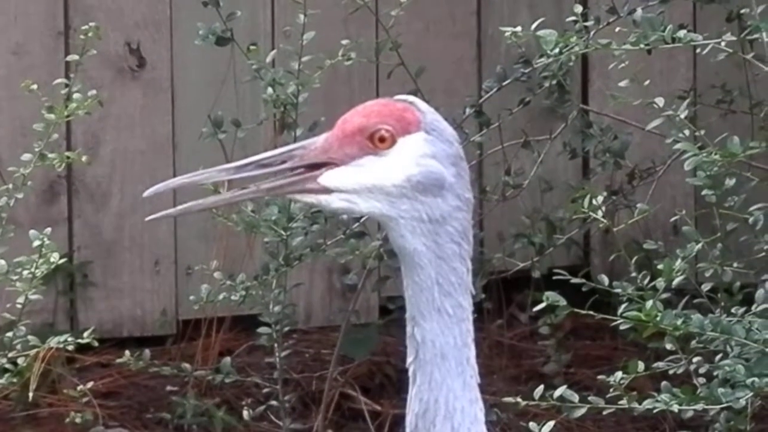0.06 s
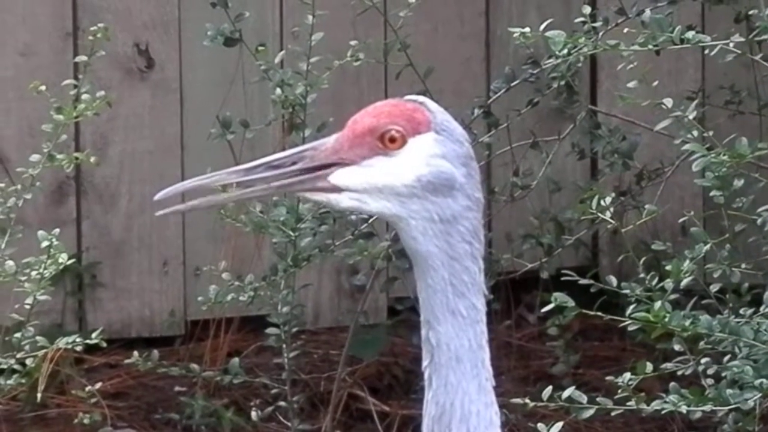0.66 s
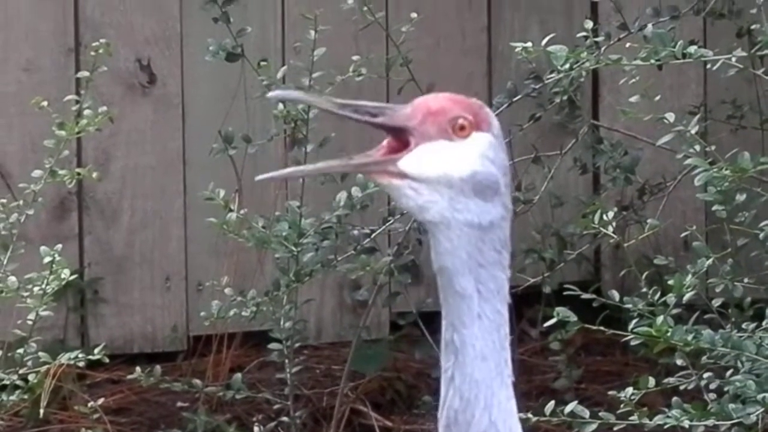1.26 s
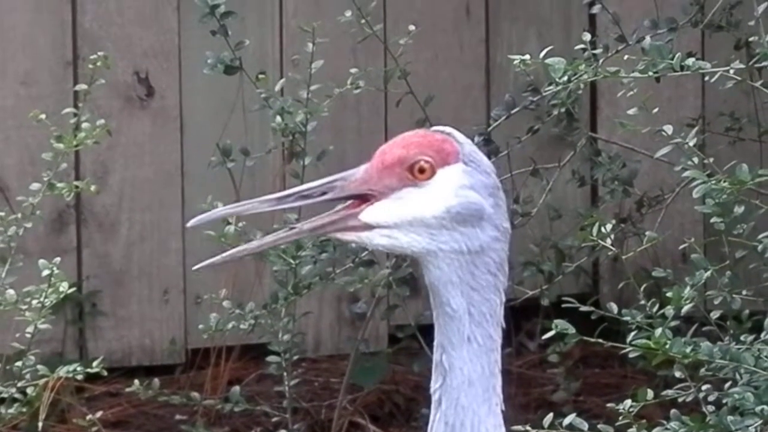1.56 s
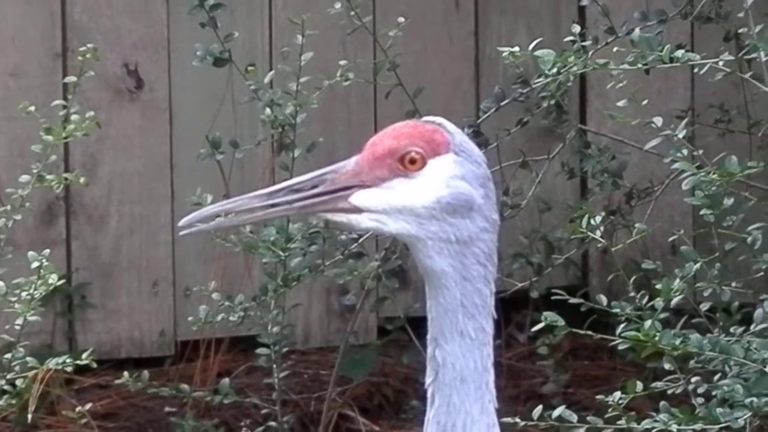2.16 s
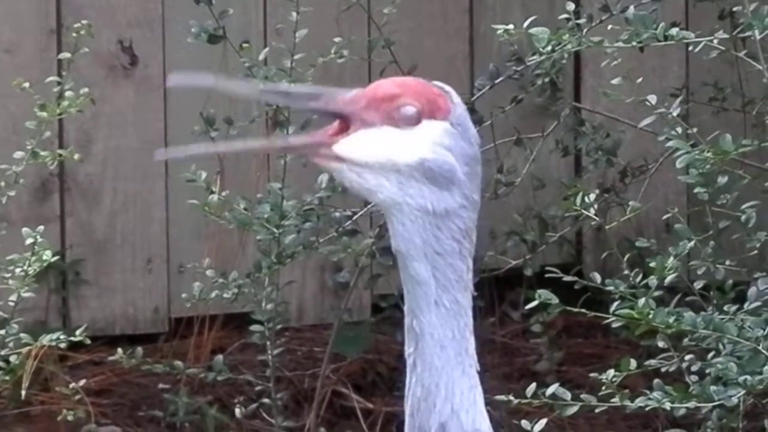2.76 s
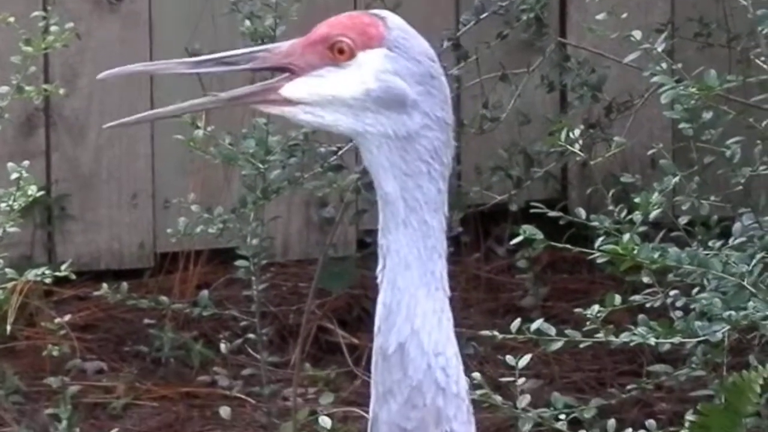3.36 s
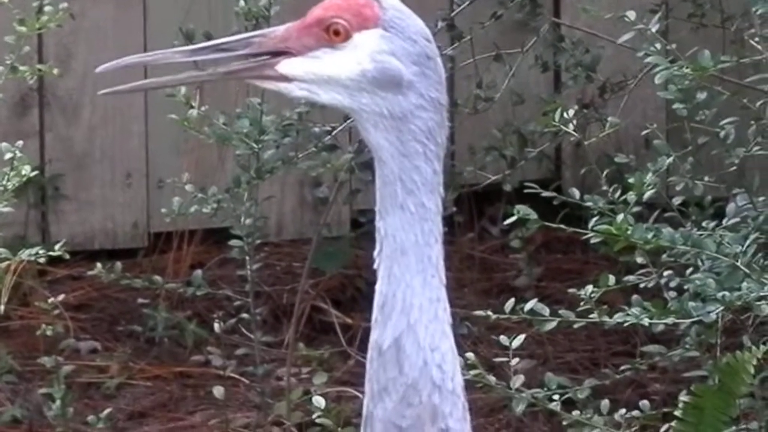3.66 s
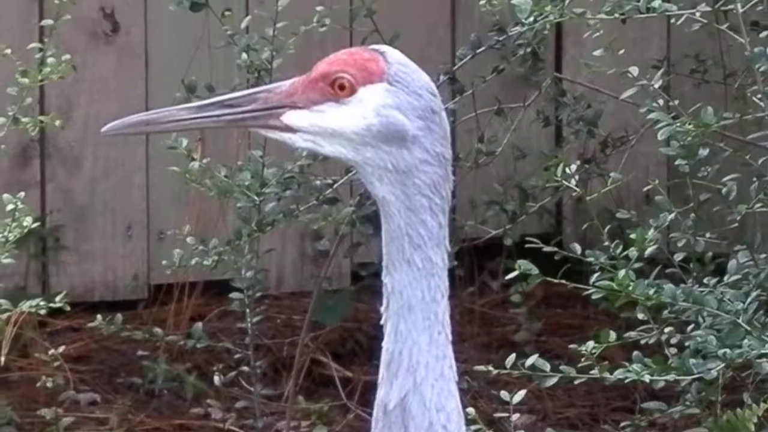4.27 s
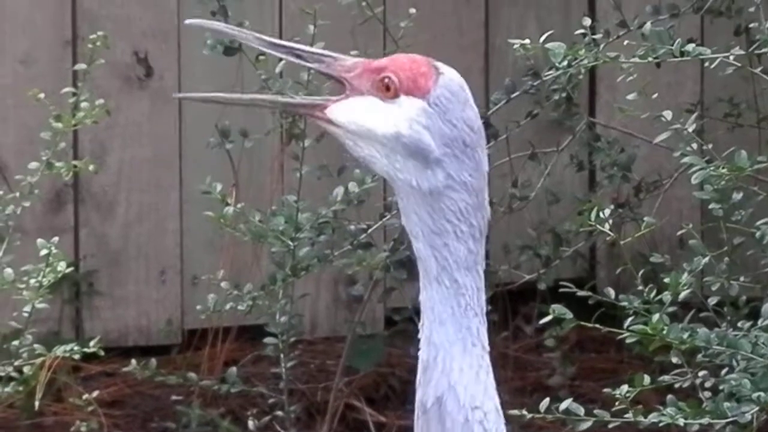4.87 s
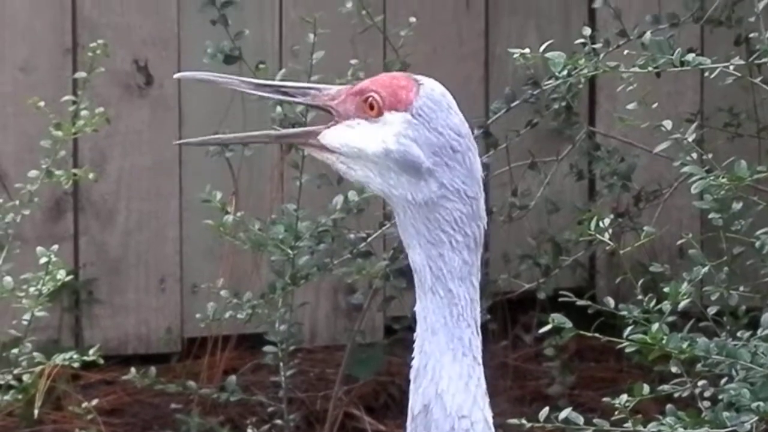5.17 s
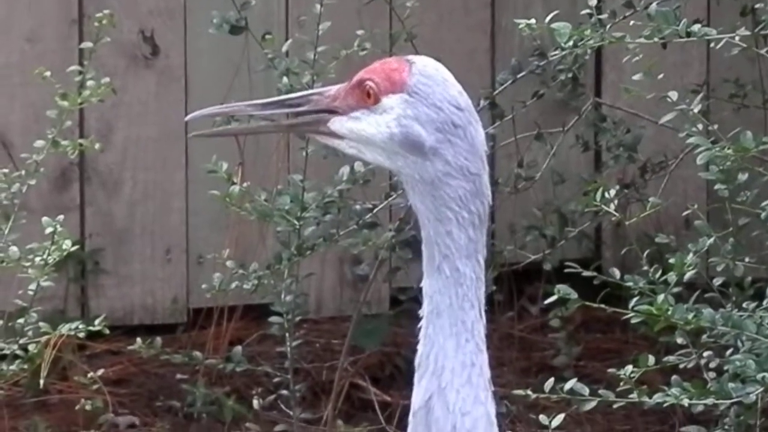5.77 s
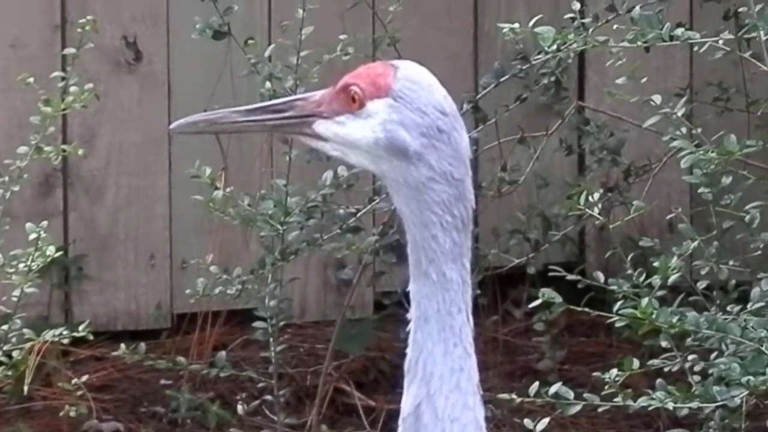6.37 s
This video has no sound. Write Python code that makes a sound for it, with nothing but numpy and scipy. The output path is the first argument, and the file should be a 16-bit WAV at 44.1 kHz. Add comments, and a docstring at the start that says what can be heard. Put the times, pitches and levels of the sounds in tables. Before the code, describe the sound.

Two cranes call close by in a fenced yard, over the low roar of distant traffic and a faint machine hum. At about 0.8 seconds a short, hoarse rising note cracks higher and breaks into a loud roll of quick falling pulses, lasting until 1.4 seconds. Similar rattles, mixed with brief squawks, come from 2.6 to 3.2 and from 4.5 to 5.2 seconds. The two voices interleave, one lower and harsher, the other higher and mellower, with a short echo. Soft, brief coos fall near 0.5, 2.1, 3.5 and 4.1 seconds. A small bird whistles faintly far off around 2.2, 4.3 and 5.8 seconds, and shrubs give light dry ticks, clearest near 1.8 and 3.9 seconds. The background drops at every call and slowly swells back. At about 6.3 seconds one more loud opening note sounds at the end.

```python
"""Two sandhill cranes give rattling calls nearby in a fenced yard, with squawks and soft coos.
Membranes in the syrinx are the source, the long windpipe is the filter: a rising note flips to a higher
register, then breaks into a roll of short falling pulses, reflected by ground, fence and wall.
Behind them a small bird whistles far off, shrubs tick, traffic roars and a machine hums.
Automatic gain control ducks the background at every call and lets it swell back."""
import sys
import numpy as np
from scipy import signal
from scipy.fft import rfft, irfft, next_fast_len
from scipy.io import wavfile
from scipy.ndimage import uniform_filter1d, map_coordinates

SR = 44100
rng = np.random.default_rng(int(sys.argv[2]) if len(sys.argv) > 2 else 0)


def wav_out(sig):
    """Save sig, one row per channel (or a flat mono array), as 16-bit PCM at SR to the path in sys.argv[1]."""
    wavfile.write(sys.argv[1], SR, np.round(np.clip(np.atleast_2d(sig).T, -1, 1) * 32767).astype(np.int16))


N = 282681
TOP_HZ = 16000


def amp(db):
    """Amplitude ratio of a level in decibels."""
    return 10 ** (np.asarray(db) / 20)


def unit(x):
    """Normalisation to rms 1."""
    return x / np.sqrt(np.mean(x ** 2) + 1e-20)


def along(points, hz):
    """Interpolation of (f/Hz, value) points on a logarithmic frequency axis."""
    f, v = np.transpose(points)
    return np.interp(np.log(hz + 1), np.log(f), v)


def clock(length):
    """Sample times over a length in seconds."""
    return np.arange(int(length * SR)) / SR


def wobble(rate, size):
    """Smooth random modulation: a spline with rate knots a second."""
    knots = rng.standard_normal(int(size * rate / SR) + 4)
    return map_coordinates(knots, [np.arange(size) * rate / SR])


def filtered(x, response):
    """Zero-phase filtering: the spectrum times a response of frequency."""
    size = next_fast_len(len(x) + 8192)
    return irfft(rfft(x, size) * response(np.fft.rfftfreq(size, 1 / SR)), size)[:len(x)]


def gate(t, length, rise, fall):
    """Envelope with raised-cosine attack and release."""
    return np.sin(np.pi / 2 * np.clip(t / rise, 0, 1) * np.clip((length - t) / fall, 0, 1)) ** 2


def add(track, start, sound):
    """Superposition of a sound on the track, from start in seconds."""
    part = track[round(start * SR):][:len(sound)]
    part += sound[:len(part)]


# spectrum of distant traffic: f/Hz, relative level/dB
TRAFFIC_SPECTRUM = [(25, -13.5), (42, -13.5), (80, -1.5), (115, -1.5), (160, -2), (250, -1.5), (384, -3.5),
                    (520, -8.5), (800, -9), (950, -15.5), (2700, -27.5), (3300, -36.5), (5000, -38),
                    (7000, -47), (9300, -46), (11500, -58), (16000, -58)]

def traffic(level_db=-18.5, patchy_db=1.5):
    """Broadband noise, strongest in the bass, modulated in patches of time and frequency."""
    spectra = signal.stft(rng.standard_normal(N), nperseg=1024)[2]
    patches = uniform_filter1d(uniform_filter1d(rng.standard_normal(spectra.shape), 6, 0), 10, 1)
    noise = signal.istft(spectra * amp(patchy_db * unit(patches)), nperseg=1024)[1][:N]
    return amp(level_db) * unit(filtered(noise, lambda f: amp(along(TRAFFIC_SPECTRUM, f))))


# partials of the machine: f/Hz, level/dB
HUM_PARTIALS = [(188.4, -29.5), (251, -27), (376.8, -30.5), (1071, -34.5), (3951, -52)]

def machine_hum():
    """A line spectrum with slight random amplitude and phase modulation."""
    t = np.arange(N) / SR
    return sum(amp(db + 2 * wobble(6, N)) * np.sin(2 * np.pi * hz * t + 0.45 * wobble(7, N))
               for hz, db in HUM_PARTIALS)


# reverberation time of the yard: f/Hz, T60/s
YARD_DECAY = [(200, .6), (900, 0.38), (3000, 0.45), (12000, 0.32)]

def yard(sound, ground_s=0.0045, fence_s=0.031, wall_s=0.039):
    """Reflection and scattering: three echoes, and a tail from shrubs that changes as the head turns."""
    hz, t, spectra = signal.stft(rng.standard_normal(SR // 2), SR, nperseg=256)
    tail = signal.istft(spectra * amp(-60 * t / along(YARD_DECAY, hz)[:, None]), SR, nperseg=256)[1]
    build_up = np.minimum(clock(1)[:len(tail)] / 0.0099, 1)
    response = amp(-4.5) * unit(tail * build_up) / np.sqrt(len(tail))
    response[round(ground_s * SR)] += amp(-15)
    response[round(fence_s * SR)] += amp(-9)
    foliage = signal.windows.hann(15)  # dulls the echo of the far wall
    add(response, wall_s, amp(-10) * foliage / foliage.sum())
    # the middle carries best, as leaves and straw absorb treble: f/Hz, gain/dB
    colour = [(650, 0), (800, 3), (950, 1.5), (1200, -4.5), (1500, -3.5), (3000, -3.5), (12000, -4)]
    response = filtered(response, lambda f: amp(along(colour, f)))
    response[0] += 1  # direct path
    return signal.fftconvolve(sound, response)


# the more distinct ticks in the shrubs: t/s, level/dB
SHRUB_TICKS = [(1.774, -25), (3.944, -30)]

def shrub_ticks(rustle_per_s=5, rustle_db=-40, t60_s=0.011):
    """Damped transients: dry, bright noise bursts, with fainter ones at random times."""
    out = np.zeros(N)
    rustle = [(start, rustle_db) for start in rng.uniform(0, N / SR, int(rustle_per_s * N / SR))]
    colour = [(2000, -10), (5000, -11), (9300, 5.5), (11000, -16)]  # f/Hz, gain/dB
    t = clock(0.02)
    for start, db in SHRUB_TICKS + rustle:
        snap = rng.standard_normal(len(t)) * amp(db - 60 * t / t60_s)
        add(out, start, filtered(snap, lambda f: amp(along(colour, f))))
    return out


# whistles of the far bird: t/s, duration/s, nominal f/Hz, level/dB
BIRD_WHISTLES = [(2.215, 0.21, 2880, -38.5), (4.27, 0.174, 2880, -40), (5.84, 0.222, 2835, -38)]

def small_bird():
    """Frequency and amplitude modulation make a pure tone arch and tremble."""
    out = np.zeros(N)
    for start, length, hz, db in BIRD_WHISTLES:
        t = clock(length)
        pitch = hz * (0.975 + 0.019 * np.sin(np.pi * t / length) + 0.0213 * wobble(119, len(t)))
        phase = 2 * np.pi * np.cumsum(pitch) / SR
        tremble = amp(db + 4.1 * wobble(36, len(t)))
        add(out, start, yard(tremble * gate(t, length, 0.016, 0.022) * np.sin(phase)))
    return out


# coos of a crane: t/s, duration/s, level/dB
CRANE_COOS = [(0.51, 0.064, -27.5), (2.064, 0.068, -28.5), (3.543, 0.052, -31.5), (4.141, 0.057, -27)]

def coos(first_hz=700, last_hz=650):
    """Low-pass radiation: the closed bill passes mainly two harmonics of a quiet, sinking note."""
    out = np.zeros(N)
    harmonics_db = [5.5, 1, -31, -25, -18, -21]
    for start, length, db in CRANE_COOS:
        t = clock(length)
        glide = first_hz + (last_hz - first_hz) * (t / length) ** 2
        pitch = glide * (1 + 0.0097 * wobble(540, len(t)))
        phase = 2 * np.pi * np.cumsum(pitch) / SR
        tone = sum(amp(level) * np.sin(k * phase) for k, level in enumerate(harmonics_db, 1))
        add(out, start, yard(amp(db) * gate(t, length, 0.016, 0.0024) * tone))
    return out


# transfer function of windpipe and open bill: f/Hz, gain/dB
WINDPIPE_RESPONSE = [(450, -11.5), (650, 2.5), (900, -2), (1250, -2.5), (1650, -11), (2000, -10.5),
                     (2420, -12.5), (2750, -16.5), (3300, -17), (3950, -11.5), (4400, -15), (5000, -13),
                     (6400, -19), (7250, -19.5), (8000, -24), (15000, -27.5)]

def windpipe(source, size=1024):
    """Resonance of a long air column, as a minimum-phase filter."""
    cepstrum = irfft(np.log(amp(along(WINDPIPE_RESPONSE, np.fft.rfftfreq(size, 1 / SR)))))
    cepstrum[1:size // 2] *= 2  # folding onto positive time makes the filter causal
    cepstrum[size // 2 + 1:] = 0
    return signal.fftconvolve(source, irfft(np.exp(rfft(cepstrum))))[:len(source)]


def syrinx(pitch, bright_db, jitter, rasp, dull_hz):
    """Source and filter: unsteady membranes and air noise chopped once a cycle drive the windpipe."""
    size = len(pitch)
    phase = 2 * np.pi * np.cumsum(pitch * (1 + jitter * wobble(949, size))) / SR
    k = np.arange(1, 25)[:, None]
    hz = k * pitch
    dispersion = np.pi * k ** 2 / 9  # the coiled windpipe smears each slap
    # overtones fade when the membranes stop slapping shut, and each slap differs in force
    slap_db = bright_db + 4 * rasp * wobble(680, size)
    harmonics = amp(slap_db * np.minimum(np.log(k) / np.log(4), 1)) / np.hypot(1, hz / dull_hz)
    tone = -np.sum(harmonics * (hz < TOP_HZ) * np.cos(k * phase + dispersion), axis=0)
    chopped = rng.standard_normal(size) * (1 + np.cos(phase))
    air = filtered(chopped, lambda f: (f / np.hypot(f, 1400)) ** 2 / np.hypot(1, f / dull_hz))
    return windpipe(tone + 3.46 * rasp * amp(bright_db) * unit(air))


# squawks among the first pulses: t/s, duration/s, first f/Hz, last f/Hz, level/dB, brightness/dB
CRANE_SQUAWKS = [(2.7, 0.039, 891, 892, 1.5, -9.5), (2.754, 0.018, 974, 930, 5, -27),
                 (4.608, 0.029, 946, 810, -4, -6), (4.638, 0.036, 868, 870, 2.5, -9.5)]

def squawks():
    """Aperiodic vibration: jitter and air noise roughen short notes."""
    out = np.zeros(N)
    for start, length, first_hz, last_hz, db, bright_db in CRANE_SQUAWKS:
        t = clock(length)
        pitch = first_hz + (last_hz - first_hz) * (t / length) ** 2
        tone = syrinx(pitch, bright_db, jitter=0.02, rasp=0.6, dull_hz=8000)
        add(out, start, yard(amp(db) * gate(t, length, 0.0073, 0.0077) * tone))
    return out


# first note of each call: t/s, time to the flip/s, duration/s, level/dB, roughness/1
OPENING_NOTES = [(0.818, 0.03, 0.068, 6.5, 0.32), (2.552, 0.045, 0.072, 2, 0.24),
                 (4.463, .049, 0.074, 0.5, 0.25), (6.335, 0.047, 0.075, 1.5, 0.3)]

def opening_notes(low_hz=612, high_hz=708, flip_hz=862, catch_s=0.0156):
    """Register break: a note starts hoarse, brightens and rises, then cracks to a higher, mellower one."""
    out = np.zeros(N)
    for start, flip_s, length, db, roughness in OPENING_NOTES:
        t = clock(length)
        flipped = np.clip((t - flip_s) / 0.0032 + 0.5, 0, 1)
        hoarse = np.clip((catch_s - t) / 0.009 + 0.5, 0, 1)  # the membranes take a few cycles to settle
        crack = np.exp(-((t - flip_s) / 0.0037) ** 2)
        glide = low_hz + (high_hz - low_hz) * t / flip_s - 30 * hoarse
        pitch = (1 - flipped) * glide + flipped * flip_hz
        rasp = roughness * (0.7 + hoarse + 2 * crack + 0.5 * flipped)
        bright_db = 3 - 10 * flipped - 7 * hoarse
        tone = syrinx(pitch, bright_db, jitter=0.035 * rasp, rasp=rasp, dull_hz=3770)
        swell_db = flipped - 19.7 * np.exp(-t / 0.048)
        add(out, start, yard(amp(db + swell_db) * gate(t, length, 0.0032, 0.003) * tone))
    return out


def pulse(crest_hz, length, bright_db, slack_hz=815, rise_s=0.0023, snap_s=0.0065):
    """Transient vibration: the syrinx snaps open, crests, then sinks in pitch and mellows."""
    t = clock(length)
    sag = (t / length) ** 1.7
    scoop = 1 - 0.12 * np.exp(-t / rise_s)
    pitch = (1.03 * crest_hz * (1 - sag) + slack_hz * sag) * scoop
    relaxed = 0.5 + 0.5 * np.tanh((t - snap_s) / 0.0025)
    harsh = np.clip(0.5 + bright_db / 12, 0.2, 1)  # the brighter the snap, the harsher
    overtones_db = bright_db + harsh * (0.3 - 16 * relaxed) - 6 * sag
    tone = syrinx(pitch, overtones_db, jitter=0.017 + 0.012 * harsh, rasp=0.22 + 0.28 * harsh,
                  dull_hz=5000 + 15000 * harsh)
    return amp(1.5 * sag) * gate(t, length, 0.0022, 0.002) * tone


# pulses of both cranes, one voice lower and harsher, the other higher and mellower:
# t/s, duration/s, nominal crest f/Hz, level/dB, brightness/dB
RATTLE_PULSES = [ (0.9499, 0.027, 1112, 6, 2.5), (0.954, 0.019, 1225, -2, 10.5),
                 (1.019, 0.02, 1200, 6, 4.5), (1.08, 0.018, 1228, 6.5, 4), (1.087, 0.014, 1092, 0.5, 5.5),
                 (1.1368, .018, 1222, 8, -2), (1.141, 0.013, 1068, -2, 10.5), (1.189, 0.017, 1226, 6.5, 2),
                 (1.195, 0.015, 1070, 4.5, 4), (1.2428, 0.014, 1210, 3.5, 3), (1.247, 0.015, 1036, 2.5, 3),
                 (1.296, 0.015, 1063, 5.5, -1), (1.301, 0.0143, 1021, -3, 4.5),
                 (1.352, 0.0068, 967, 2.5, -1.5), (1.413, 0.015, 997, -18, -7),
                 (2.6927, 0.014, 1088, 2, 0.5), (2.7635, 0.021, 1123, 1.5, 4.5), (2.805, .02, 1224, 9.5, 0),
                 (2.827, 0.016, 1104, 2.5, 7.5), (2.873, .019, 1230, 8.5, 1.5), (2.884, .014, 1100, 3, 8),
                 (2.936, 0.016, 1222, 9, 1), (2.94, 0.018, 1050, 2, 9.5), (2.989, .016, 1253, 9, -3),
                 (2.991, 0.013, 1091, 2.5, 10.5), (3.0415, 0.018, 1240, 7, 2), (3.043, .011, 1098, 5.5, -2),
                 (3.091, 0.023, 1180, 6.5, 0), (3.1425, 0.026, 1081, 4, -3), (3.2048, 0.0084, 967, 0, -4.5),
                 (4.603, 0.02, 1101, -3.5, 4.5), (4.672, 0.023, 1085, 2, 4), (4.738, .019, 1226, 7, 0),
                 (4.74, 0.0078, 1100, 0.5, 4.5), (4.797, 0.02, 1110, 2.5, 5),
                 (4.807, 0.015, 1255, 5.5, 1.5), (4.852, 0.017, 1105, 2.5, 4.5),
                 (4.864, 0.016, 1253, 5.5, -1), (4.9051, 0.016, 1060, 5.5, 3), (4.923, 0.018, 1218, 6, 0),
                 (4.9555, 0.017, 1042, 4, 2), (4.975, 0.017, 1236, 5, -3), (5.0086, 0.0088, 1000, 0, 5),
                 (5.026, 0.017, 1215, 4.5, -3.5), (5.054, 0.016, 1067, -7.5, 4), (5.08, 0.022, 1122, 2, -5),
                 (5.108, 0.017, 1100, -11.5, 10), (5.1386, 0.004, 1000, 2.5, -14),
                 (5.164, 0.0074, 976, -8.5, -2.5)]

def rattle():
    """Two interleaved pulse trains, each about 19 a second: slow enough to be heard as a roll."""
    out = np.zeros(N)
    for start, length, crest_hz, db, bright_db in RATTLE_PULSES:
        add(out, start, yard(amp(db) * pulse(crest_hz, length, bright_db)))
    return out


def scene():
    """Superposition of the cranes and the outdoor background in one channel."""
    cranes = opening_notes() + rattle() + squawks() + coos()
    return (cranes + small_bird() + shrub_ticks() + traffic() + machine_hum())[None]


def record(dry, ceiling_db=-15, release_db_per_s=17, start_cut_db=6, sense_hz=400):
    """Automatic gain control with fast attack and slow release, followed by a band limit."""
    sound = dry[0]
    sensed = filtered(sound, lambda f: f / np.hypot(f, sense_hz))  # the detector is deaf to rumble
    level_db = 10 * np.log10(np.abs(uniform_filter1d(sensed ** 2, size=130)) + 1e-12)
    excess_db = np.maximum(level_db - ceiling_db, 0)
    excess_db[0] = start_cut_db
    recovery_db = release_db_per_s * np.arange(N) / SR
    cut_db = np.maximum.accumulate(excess_db + recovery_db) - recovery_db
    ducked = sound * amp(-uniform_filter1d(cut_db, size=60))
    return filtered(ducked, lambda f: f < TOP_HZ)[None]


dry = scene()
out = record(dry)
wav_out(out)
```